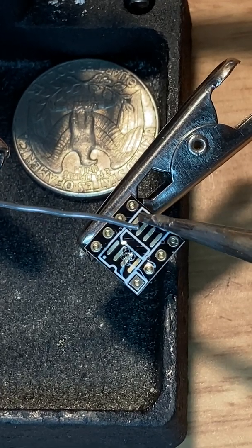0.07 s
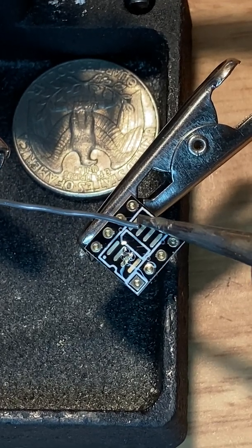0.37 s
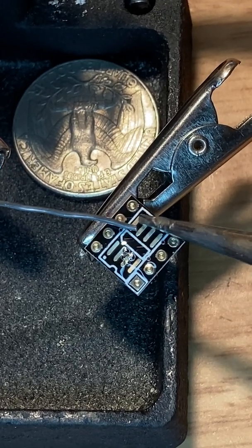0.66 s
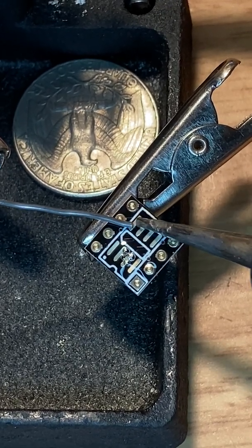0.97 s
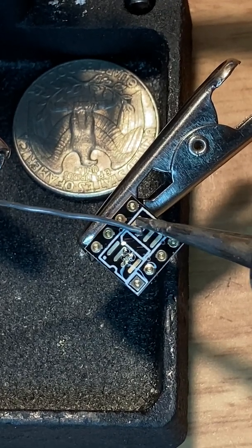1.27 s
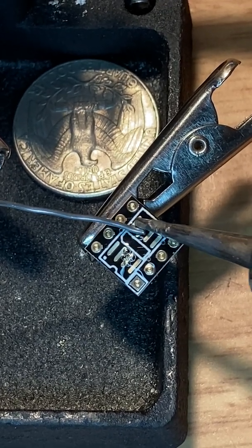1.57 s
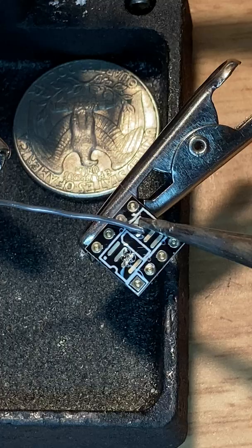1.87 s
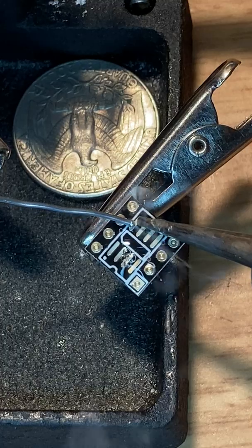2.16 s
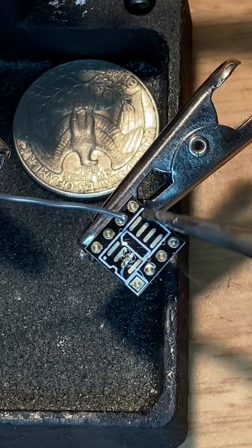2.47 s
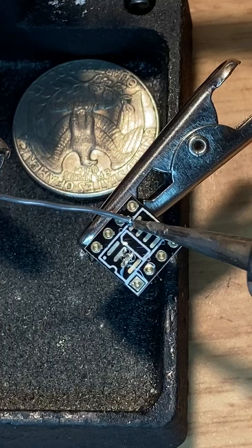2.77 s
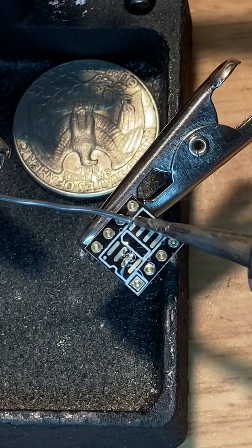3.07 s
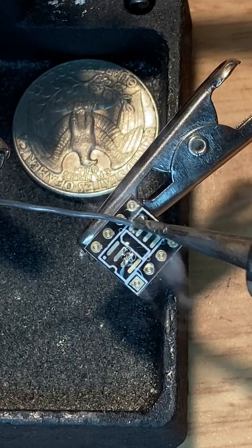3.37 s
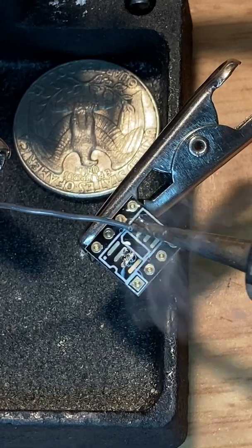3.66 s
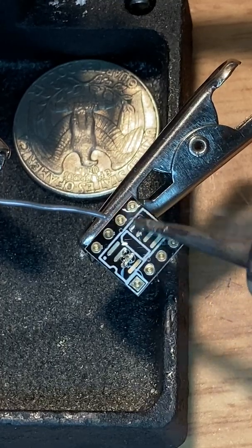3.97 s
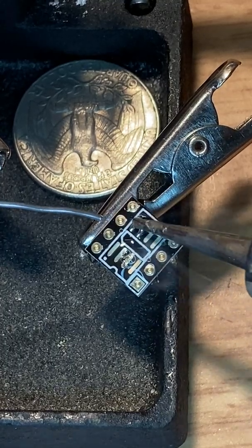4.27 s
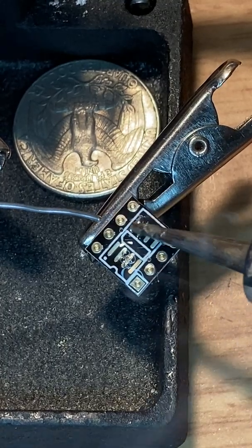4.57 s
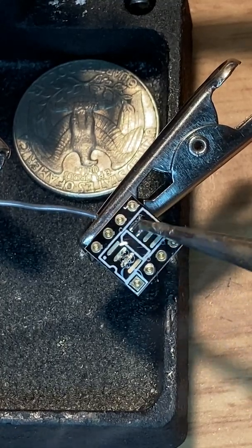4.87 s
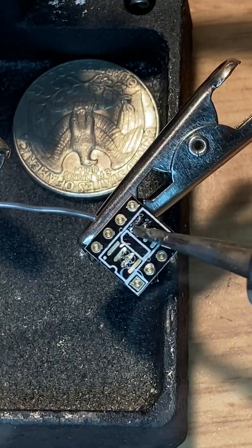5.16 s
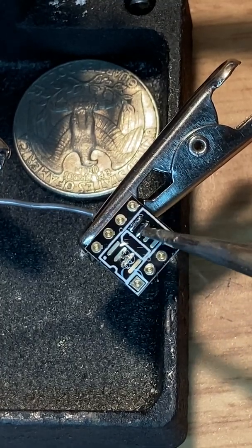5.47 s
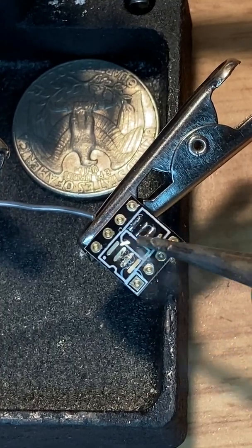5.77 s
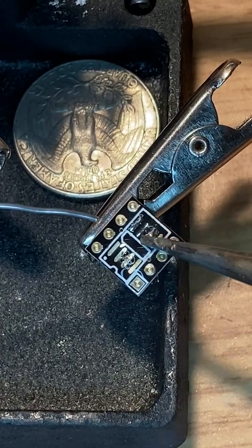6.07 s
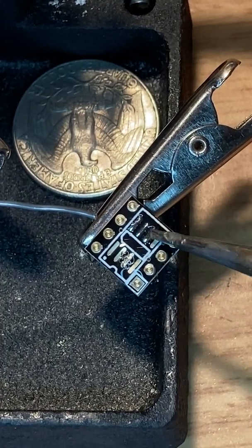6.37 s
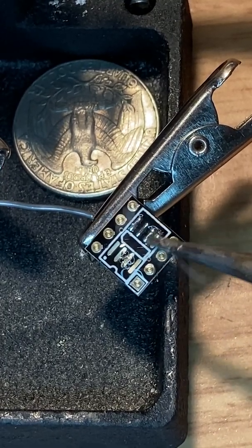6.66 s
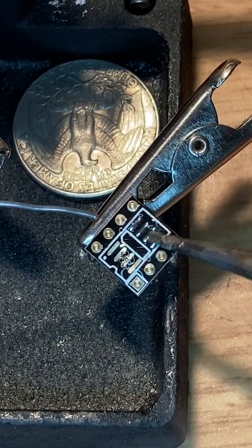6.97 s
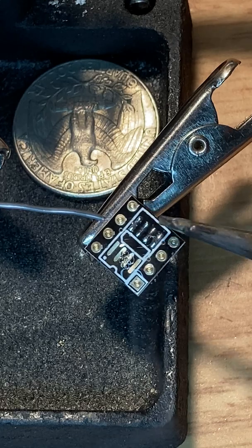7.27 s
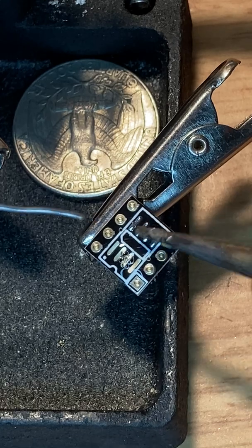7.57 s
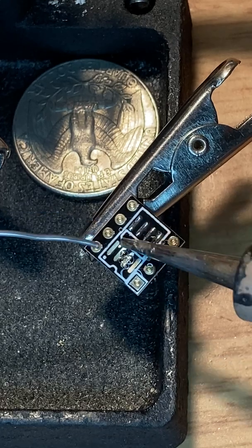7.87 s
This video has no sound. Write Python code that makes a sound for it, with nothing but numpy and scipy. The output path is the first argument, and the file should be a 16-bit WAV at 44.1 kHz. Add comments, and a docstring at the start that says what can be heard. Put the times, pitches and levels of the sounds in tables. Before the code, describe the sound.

A soldering iron melts solder with a faint, high sizzle and tiny spits in short spells, over a low steady hum.

```python
"""Flux boils on a soldering iron that touches a small circuit board in short spells: thousands of tiny
bursting bubbles merge into a sizzle, and single large ones stand out as spits. Board and holder colour
these impulses by resonance, and they reach a close pair of microphones with a short room tail.
The steel clamp clinks lightly a few times, fingers rub, and a low steady hum fills the small room."""
import sys
import numpy as np
from scipy import signal
from scipy.fft import rfft, irfft, next_fast_len
from scipy.io import wavfile
from scipy.ndimage import uniform_filter1d, map_coordinates

SR = 44100
rng = np.random.default_rng(int(sys.argv[2]) if len(sys.argv) > 2 else 0)


def generate_wav(signal):
    """Clip the signal to [-1, 1] and save it as 16-bit WAV at the path in sys.argv[1]."""
    frames = np.transpose(np.atleast_2d(signal))
    scaled = np.clip(frames, -1, 1) * 32767
    pcm = np.round(scaled).astype(np.int16)
    wavfile.write(sys.argv[1], SR, pcm)


N = 348390
TOP_HZ = 15850  # upper band limit


def sizzle(fizz_db=0.5, coarse_db=3.5, split_hz=10800, body_hz=3000, body_follow=0.94):
    """Bubble size sets the band: fine fizz lies on top, larger bubbles below, and the largest add body."""
    strength, coarseness_db, crackle_db, tick_rate = boiling()
    pops = strength * bubbles(crackle_db, tick_rate)
    low = filtered(pops, lambda hz: 1 / (1 + (hz / split_hz) ** 10))
    body = filtered(pops, lambda hz: 1 / (1 + (hz / body_hz) ** 10))
    coarse = low - body + amp(body_follow * coarseness_db) * body
    return amp(fizz_db) * (pops - low) + amp(coarse_db + coarseness_db) * coarse


def boiling(swell_power=1.51, sputter_db=2.0, sputter_rate=25):
    """Incoherent sources add in power: overlapping spells sum, and each sets the texture by its share."""
    # One spell each time the tip meets fresh flux. Each row: start in seconds, length in seconds,
    # relative level in dB, swell in seconds, sag in dB per second (negative grows), dying-away T60 in
    # seconds, coarseness in dB, ticks against the hiss in dB, ticks per second.
    spells = [(1.346, .13, -66.5, 0.008, -31, .091, -12.5, -7, 260),
              (1.697, .038, -65, .023, -6.5, 0.078, -13, -3, 150),
              (1.843, 0.089, -64, 0.0043, -80, 0.13, -6, -7, 270),
              (1.851, 0.38, -43.5, 0.19, 14, 0.052, -3.5, -5, 260),
              (2.244, 0.074, -52.5, 0.0046, 26.5, 0.06, 2.5, 6, 207),
              (2.313, 0.09, -55, 0.038, -12, 0.034, -2, -6.5, 260),
              (2.731, 0.16, -64.5, 0.0078, 22, 0.057, -5, 0, 220),
              (2.918, 0.069, -43, 0.042, -2, 0.061, -2, -5, 335),
              (2.991, .13, -49, 0.03, 11, .015, 0, 4, 252),
              (3.149, 0.057, -49.5, 0.0071, 1.5, 0.06, 0, 3.5, 257),
              (3.192, 0.31, -43.5, 0.0079, 3, 0.29, -3.5, -2.5, 232),
              (3.489, 0.07, -46, .032, 4, 0.077, 0.5, -1.5, 280),
              (3.561, 0.093, -50, .012, 21, 0.089, -1.5, -5.5, 257),
              (3.657, .012, -43, 0.0023, 0, 0.094, 1.5, -4, 287),
              (3.675, 0.074, -43, .012, 32, 0.086, 0, -1.5, 275),
              (3.733, .35, -47, 0.063, 5.5, 0.46, -3, -7.5, 268),
              (4.165, 0.19, -52, 0.0027, 45, 0.13, -6, -2.5, 273),
              (4.329, 0.19, -57, 0.036, 12, .18, -4.5, -2, 250),
              (4.533, 0.021, -55, 0.0049, 0, 0.23, -3.5, 2, 260),
              (4.574, 0.18, -63, 0.021, 5, 0.092, -3, 2, 185),
              (4.709, 0.18, -58, .03, -11, 0.067, -5, -2, 260),
              (4.918, 0.069, -50.5, .014, 70, 0.092, -1, -8, 340),
              (4.997, 0.09, -54.5, 0.0043, 1, 0.069, -2.5, 1.5, 190),
              (5.094, 0.034, -59.5, 0.0029, -1, 0.045, -6.5, 6, 176),
              (5.121, 0.02, -56, 0.0051, 0, 0.081, -4, 2, 220),
              (5.148, .19, -52, 0.026, 49.5, 0.13, -6.5, -1, 230),
              (5.492, 0.049, -56.5, 0.039, 0, 0.17, -11.5, -0.5, 240),
              (5.583, 0.14, -63.5, 0.034, 2, 0.11, -8, -1, 220),
              (5.673, .025, -48.5, .006, -0.5, .08, -4, -14, 300),
              (5.7, 0.057, -51.5, .01, -35, 0.048, -2.5, -3.5, 290),
              (5.757, 0.056, -49, .004, 29, 0.031, 0, -3, 260),
              (5.851, 0.011, -62.5, 0.0031, 3, .081, 2.5, -4, 310),
              (5.885, 0.053, -57.5, 0.0042, 9, .09, .5, 7.5, 235),
              (5.983, 0.042, -53, 0.0031, 56, .025, 3, 10, 310),
              (6.065, 0.091, -56, 0.0031, 26, 0.036, 2, 9, 260),
              (6.162, 0.089, -49, 0.038, 8, 0.063, 1.5, -5, 274),
              (6.248, 0.081, -56.5, 0.0096, 203, 0.064, 0.5, -2, 290),
              (6.556, 0.089, -60, 0.045, 29, 0.039, -8, -7, 215),
              (6.66, 0.061, -51, .007, -1, 0.055, -4, -3.5, 286),
              (6.716, 0.044, -46.5, .015, 0, 0.034, 0, -1.5, 260),
              (6.769, 0.064, -56.5, 0.036, 1, 0.21, -4, -7, 285),
              (6.867, 0.22, -65.5, 0.015, -35.5, 0.082, -3.5, -1.5, 262),
              (7.065, 0.11, -57.5, 0.0044, 14.5, 0.079, 0, 5.5, 167),
              (7.195, .11, -53.5, .012, 3, .038, -2, -4, 220)]
    power, texture = np.full(N, 1e-14), np.zeros((3, N))
    for start, length, db, swell, sag, t60, coarseness_db, crackle_db, tick_rate in spells:
        first = round(start * SR)
        t = np.arange(min(N - first, SR)) / SR
        rise = np.minimum(t / swell, 1) ** swell_power
        sag_db = sag * np.clip(t - swell, 0, length)
        release_db = 60 * np.maximum(t - length, 0) / t60
        spell = (rise * amp(db - sag_db - release_db)) ** 2
        power[first:first + len(t)] += spell
        texture[:, first:first + len(t)] += np.outer([coarseness_db, crackle_db, tick_rate], spell)
    strength = np.sqrt(power) * amp(sputter_db * wobble(sputter_rate))
    return strength, *(texture / power)


def bubbles(crackle_db, tick_rate, clump_db=1.0, clump_rate=70):
    """Superposition: dense hiss and distinct ticks mix at an rms near 1 and surge in clumps."""
    share = amp(crackle_db)
    crackle = ticks(share, tick_rate, jitter=.45, spread_db=3.5)
    mix = fine_bursts(rate=11000, spread_db=3.5) + share * crackle
    return mix / np.hypot(1, share) * amp(clump_db * wobble(clump_rate))


def fine_bursts(rate, spread_db):
    """Shot noise: countless tiny bursts at independent random moments merge into a hiss of rms 1."""
    sizes = amp(spread_db * np.clip(rng.standard_normal(N), -3, 2))
    return unit((rng.random(N) < rate / SR) * sizes * rng.choice([-1, 1], N))


def ticks(share, rate, jitter, spread_db):
    """A jittered pulse train: larger bubbles burst a few ms apart, more evenly where they dominate."""
    beats = np.flatnonzero(np.diff(np.floor(np.cumsum(rate) / SR)))
    lateness, size = rng.standard_normal((2, N))[:, beats]
    gap_samples = SR / np.maximum(rate[beats], 100)
    looseness = 1 / np.hypot(1, share[beats])
    onsets = np.clip(beats + jitter * looseness ** 2 * lateness * gap_samples, 0, N - 1).astype(int)
    sizes = unit(amp(spread_db * looseness * np.clip(size, -3, 1.5)))
    return np.bincount(onsets, sizes * np.sqrt(gap_samples), N)


def bubble_click(size=2048):
    """The minimum-phase impulse response of one bursting bubble and the parts that resonate with it."""
    # The spectrum of one burst. Each row: frequency in Hz, relative spectral density in dB.
    spectrum = [(200, -34), (800, -16), (1300, -18), (2000, -12.5), (3300, -23.5), (4300, -9),
                (5500, -13.5), (7000, -9.5), (10700, -3.5), (12500, -0.8), (15600, 0)]
    # Resonances and dips of board, clamp and tray. Each row: centre in Hz, width in Hz, gain in dB.
    resonances = [(1580, 44, 3.2), (1790, 95, 2.6), (2205, 122, 5.1), (2878, 80, 3.9), (3222, 51, 5.4),
                  (3380, 24, -4.3), (3720, 133, 4.0), (4025, 28, -7.1), (4145, 23, 3.5), (4330, 48, 2.0),
                  (4487, 37, -4.9), (4883, 80, 2.6), (5085, 115, -5.6), (5406, 66, 3.0), (5721, 96, 3.7),
                  (6085, 77, -7.7), (6446, 77, 3.0), (6742, 30, -5.0), (6990, 97, 2.3), (7547, 56, -7.0),
                  (7774, 103, 6.4), (8075, 67, 4.9), (8231, 21, -3.9), (8691, 83, 10.6), (8877, 60, 5.2),
                  (9341, 88, -5.5), (9552, 31, 4.2), (10015, 33, -6.0), (10149, 67, 3.3), (10398, 45, 2.7),
                  (10828, 111, -6.9), (11278, 169, 5.9), (11700, 24, -4.6), (12120, 136, 4.7),
                  (12970, 167, 2.4), (14783, 36, -3.6)]
    hz = np.fft.rfftfreq(size, 1 / SR)
    cepstrum = irfft(np.log(amp(along(spectrum, hz) + bells(resonances, hz))))
    cepstrum[1:size // 2] *= 2  # folding onto positive time makes the click causal
    cepstrum[size // 2 + 1:] = 0
    response = np.exp(rfft(cepstrum))
    return irfft(response) / np.linalg.norm(irfft(response * (hz < TOP_HZ)))  # unit energy in band


def spits(gain_db=2.1, spray_db=-27, spray_t60=.012, second_click_s=(.0003, .0011), second_click_db=-7):
    """A large bubble's snap, a weaker second click just after it and a brief spray."""
    # Single spits of flux. Each row: time in seconds, relative peak level in dB.
    events = [(0.8781, -47), (1.0874, -43), (1.184, -39), (1.1968, -42), (1.6298, -46), (1.7864, -41.5),
              (1.9144, -36), (1.9967, -26), (2.044, -26), (2.0905, -26), (2.1332, -27), (2.1587, -26),
              (2.1651, -25), (2.1988, -28), (2.2328, -31), (2.2365, -31), (2.2525, -20), (2.2579, -28),
              (2.2655, -31), (2.2721, -27), (2.2769, -27), (2.2943, -26), (2.3026, -28), (2.3339, -27),
              (2.7424, -40), (2.8152, -35), (2.8273, -31), (2.9409, -27), (2.9571, -25), (2.9633, -25),
              (2.9792, -15), (2.9839, -25), (3.0049, -26), (3.0312, -19), (3.0509, -26), (3.0692, -25),
              (3.0734, -24), (3.0795, -21), (3.0904, -27), (3.0949, -23), (3.1063, -27), (3.1173, -29),
              (3.1355, -28), (3.1395, -31), (3.161, -20), (3.1749, -27), (3.181, -24), (3.1876, -20),
              (3.1988, -20), (3.2079, -24), (3.2144, -23), (3.2182, -25), (3.2333, -25), (3.2463, -21),
              (3.2515, -24), (3.2566, -24), (3.2638, -25), (3.3521, -22), (3.3689, -26), (3.3819, -24),
              (3.4075, -23), (3.4336, -25), (3.4468, -24), (3.5015, -26), (3.5284, -25), (3.5394, -24),
              (3.5423, -24), (3.5462, -17), (3.5517, -16), (3.5559, -19.5), (3.6319, -31), (3.6623, -20.5),
              (3.6934, -21), (3.7059, -19), (3.7114, -23), (3.7312, -14.5), (3.7433, -26), (3.7538, -30),
              (3.7976, -27), (3.9079, -23), (4.0149, -25.5), (4.0296, -28), (4.0429, -28), (4.0686, -24),
              (4.169, -34), (4.5554, -31), (4.9215, -37), (4.9266, -33), (4.9315, -22), (5.6753, -18),
              (5.748, -28), (5.7688, -20), (5.7841, -18), (5.8066, -31), (5.8877, -36), (5.8953, -37),
              (5.9049, -37), (5.931, -36), (5.9637, -33), (5.9743, -29), (5.9847, -30), (6.0666, -28),
              (6.0738, -36), (6.1339, -33), (6.1412, -36), (6.1508, -32), (6.1824, -38), (6.6703, -22),
              (6.756, -26), (6.7598, -30), (7.2001, -33), (7.3064, -33)]
    # A spit is fuller in the lower treble than the fizz. Each row: frequency in Hz, gain in dB.
    colour = [(1000, 0), (2100, 0), (3100, 4.5), (5000, 2), (6500, 3), (8700, -0.5), (11500, 1.5),
              (15000, -0.5)]
    out, t = np.zeros(N + SR), np.arange(SR // 25) / SR
    for (start, db), delay in zip(events, rng.uniform(*second_click_s, len(events))):
        snap = amp(spray_db - 60 * t / spray_t60) * rng.standard_normal(len(t))
        snap[0] = 1
        snap[round(delay * SR)] -= amp(second_click_db)
        out[round(start * SR):][:len(t)] += amp(db + gain_db) * snap
    return filtered(out[:N], lambda hz: amp(along(colour, hz)))


def stereo_and_room(x):
    """The recorder's stereo image sets phase and level by frequency; reverberation adds a short tail."""
    # The phase difference. Each row: frequency in Hz, lead of the left channel in radians.
    phase_lead = [(0, 0), (340, 0), (690, -2.7), (1000, -3.4), (1500, -5.3), (2600, -5.5), (3300, -3.1),
                  (4000, -5.1), (5200, -3.2), (6100, -3), (6800, -1.6), (7600, -.5), (8300, 0), (9100, .1),
                  (11000, 2.6), (11900, 3.14), (13000, 4.1), (14600, 6.1), (16500, 6.6)]
    # The level difference. Each row: frequency in Hz, left minus right in dB.
    balance = [(700, 0), (1400, -3), (2200, -4), (3000, 2), (3700, 1.5), (4200, -3), (5200, 0)]
    # The room's reverberation time. Each row: frequency in Hz, T60 in seconds.
    decay_times = [(300, .3), (3000, .19), (15000, .13)]
    # The room's share of the sound. Each row: frequency in Hz, gain in dB.
    room_share = [(500, 0), (1500, -3.5), (4000, -6), (8000, -14), (15000, -15.5)]

    def stereo_image(hz):
        gain = amp(np.outer([.5, -.5], along(balance, hz)))
        return gain * np.exp(np.outer([.5j, -.5j], along(phase_lead, hz)))

    hz, t, noise = signal.stft(rng.standard_normal((2, SR // 2)), SR, nperseg=256)
    decay = amp(-60 * t / along(decay_times, hz)[:, None])
    tail = signal.istft(noise * decay, SR, nperseg=256)[1]
    reverb = signal.fftconvolve(x[None], tail / np.linalg.norm(tail[0]), axes=1)[:, :N]
    return filtered(x, stereo_image) + filtered(reverb, lambda hz: amp(along(room_share, hz)))


def clinks(attack_s=0.00089, vary_db=7.0):
    """Damped modal vibration: light touches ring the steel clamp, some duller, some brighter."""
    # Touches on the clamp. Each row: time in seconds, relative level in dB, tilt in dB per octave.
    touches = [(.843, -81, 8), (.866, -71, -2), (.977, -71, 0), (7.452, -80, 6), (7.488, -80, 0)]
    # The clamp's modes. Each row: frequency in Hz, relative level in dB, T60 in seconds.
    modes = [(1270, 0, .06), (1700, -7, .07), (2230, -5, .05), (3400, -14, .025), (3600, -13, .025),
             (3990, -11, .03)]
    out, t = np.zeros((2, N + SR)), np.arange(SR // 4) / SR
    onset = 1 - np.exp(-t / attack_s)
    for start, touch_db, tilt in touches:
        for hz, mode_db, t60 in modes:
            db = touch_db + mode_db + tilt * np.log2(hz / 2000) + vary_db * rng.standard_normal()
            ring = np.sin(2 * np.pi * (hz * t + rng.random((2, 1)) / 2))
            out[:, round(start * SR):][:, :len(t)] += amp(db - 60 * t / t60) * ring * onset
    return out[:, :N]


def hands(flutter_db=8.0, flutter_rate=34.8, idle_db=-87, fidget_db=3, fidget_rate=7):
    """Friction noise: fingers shift on iron and wire, never quite still, with a few soft rubs."""
    # Rubs as the hands settle. Each row: middle in seconds, half-length in seconds, level in dB.
    rubs = [(0.737, 0.027, -73), (1.002, 0.04, -67), (1.22, 0.092, -76.5), (1.54, 0.14, -81),
            (7.496, 0.019, -87)]
    # The friction spectrum. Each row: frequency in Hz, relative spectral density in dB.
    spectrum = [(300, -37), (800, -4.5), (1150, 5.5), (1600, -4.5), (2200, -4.5), (2800, -38), (3700, -12),
                (6000, -26), (15000, -25)]
    t = np.arange(N) / SR
    swells = sum(amp(db) * np.exp(-((t - middle) / half) ** 2) for middle, half, db in rubs)
    idle = amp(idle_db + fidget_db * np.tanh(wobble(fidget_rate)))
    friction = filtered(rng.standard_normal((2, N)), lambda hz: amp(along(spectrum, hz)))
    return np.hypot(swells, idle) * unit(friction * amp(flutter_db * wobble(flutter_rate)))


def hum(rumble_db=-55.0, swell_db=.5, swell_rate=5, tone_db=-61, tone_hz=57.9, waver_db=3.5, drift=0.98):
    """Resonance shapes noise into a rumble, nearly mono in the bass, around a wavering low tone."""
    # The room's rumble and faint hiss. Each row: frequency in Hz, relative spectral density in dB.
    spectrum = [(20, -36.5), (35, -21), (52, 1), (100, -4), (170, -11.5), (340, -11), (400, -19),
                (620, -24), (1000, -26), (1500, -34), (3000, -46), (6000, -49), (9500, -49), (15000, -53)]
    # Resonances in the rumble. Each row: centre in Hz, width in Hz, gain in dB.
    resonances = [(93.6, 6.8, 2.1), (127.5, 7.6, 3.5), (144, 3.85, 12.7), (195.1, 11.9, 8.7),
                  (225.8, 11.2, 3.9), (295.7, 6.3, 2.5), (303.4, 9.7, 1.6), (472, 30, 3.4), (554, 6.3, 2.7),
                  (727, 11, 4.4), (812, 7.3, 8.3), (928, 9.1, 3.2), (1155, 5, 4.9), (9100, 29, 8.2)]
    # Likeness of the channels. Each row: frequency in Hz, correlation (limited to -1..1 below).
    correlation = [(100, 0.94), (280, 0.93), (450, 0.26), (700, -0.5), (1400, -0.58), (4000, -0.23),
                   (6000, -0.85), (9000, 1), (12000, -1.4), (15000, 1)]

    def mid_side_response(hz):
        angle = np.arccos(np.clip(along(correlation, hz), -1, 1)) / 2
        return amp(along(spectrum, hz) + bells(resonances, hz)) * [np.cos(angle), np.sin(angle)]

    mid, side = filtered(patchy(rng.standard_normal((2, N))), mid_side_response)
    rumble = unit(np.array([mid + side, mid - side]))
    phase = 2 * np.pi * tone_hz * np.arange(N) / SR + drift * wobble(rate=4.5)
    tone = unit(np.sin(phase) * amp(waver_db * wobble(rate=6.4)))
    return amp(rumble_db + swell_db * wobble(swell_rate)) * rumble + amp(tone_db) * tone


def patchy(x, patch_bins=5, patch_frames=12):
    """Random amplitude modulation: neighbouring frequencies swell and sink together for a moment."""
    # Unevenness of the room's noise in the middle register. Each row: frequency in Hz, depth in dB.
    depth = [(350, 0), (600, 2.5), (1500, 2.5), (3000, 0)]
    hz, _, frames = signal.stft(x, SR, nperseg=1024)
    patches = uniform_filter1d(rng.standard_normal(frames.shape[1:]), patch_bins, axis=0)
    patches = uniform_filter1d(patches, patch_frames, axis=1)
    gain = amp(along(depth, hz)[:, None] * unit(patches))
    gain /= np.sqrt(np.mean(gain ** 2, 1, keepdims=True))
    return signal.istft(frames * gain, SR, nperseg=1024)[1][:, :N]


def amp(db):
    """Decibels to amplitude ratio."""
    return 10 ** (np.asarray(db) / 20)


def unit(x):
    """Normalisation to rms 1."""
    return x / np.sqrt(np.mean(x ** 2) + 1e-20)


def along(points, hz):
    """Interpolation of (Hz, value) points on a logarithmic frequency axis."""
    frequencies, values = np.transpose(points)
    return np.interp(np.log(hz + 1), np.log(frequencies + 1), values)


def bells(peaks, hz):
    """Gain in dB of a set of resonances, each a Gaussian bell."""
    return sum(db * np.exp(-.5 * ((hz - centre) / width) ** 2) for centre, width, db in peaks)


def wobble(rate):
    """Slow noise: a smooth curve through rate random knots a second."""
    return map_coordinates(rng.standard_normal(int(N * rate / SR) + 4), [np.arange(N) * rate / SR])


def filtered(x, response):
    """Linear filtering: the spectrum of x is multiplied by a complex frequency response."""
    size = next_fast_len(N + SR // 2)
    return irfft(rfft(x, size) * response(np.fft.rfftfreq(size, 1 / SR)), size)[..., :N]


def scene():
    """Convolution gives all bursts one ring and one place on the bench; the other sources add to it."""
    click = bubble_click()
    snaps = spits() / np.abs(click).max()
    flux = signal.fftconvolve(sizzle() + snaps, click)[:N]
    return stereo_and_room(flux) + clinks() + hands() + hum()


def record(dry):
    """Band limiting: a steep low-pass removes the highest treble."""
    return filtered(dry, lambda hz: 1 / (1 + (hz / TOP_HZ) ** 240))


dry = scene()
out = record(dry)
generate_wav(out)
```